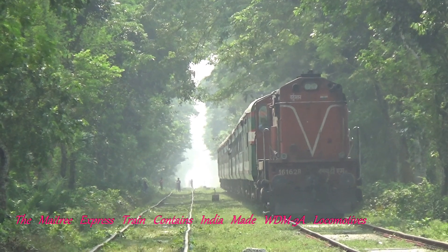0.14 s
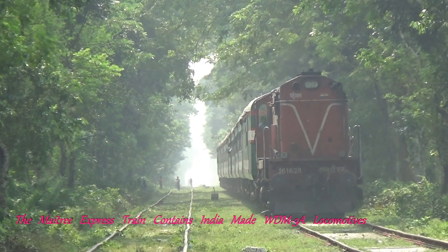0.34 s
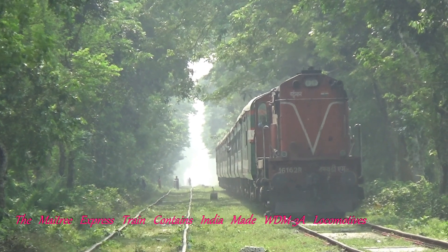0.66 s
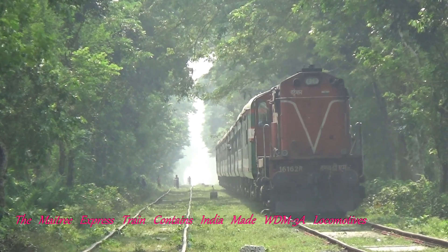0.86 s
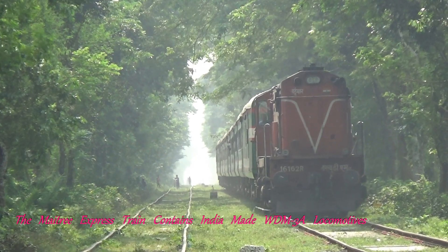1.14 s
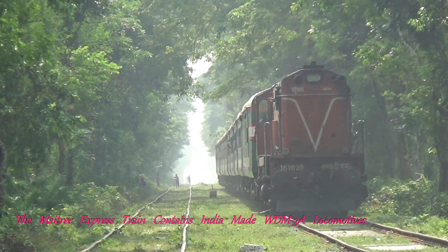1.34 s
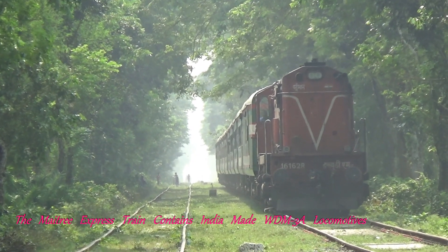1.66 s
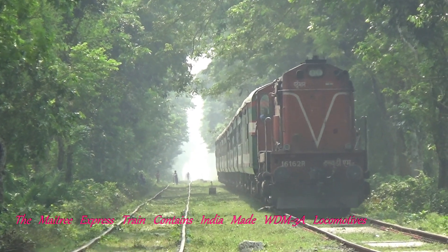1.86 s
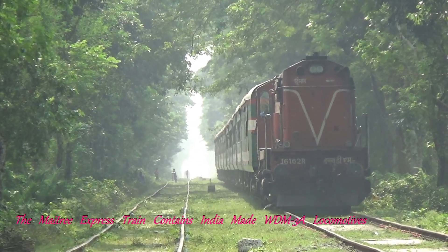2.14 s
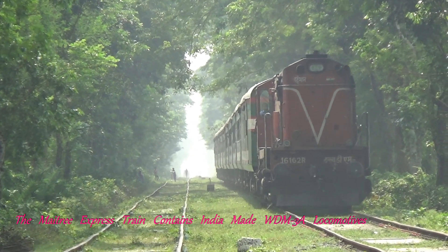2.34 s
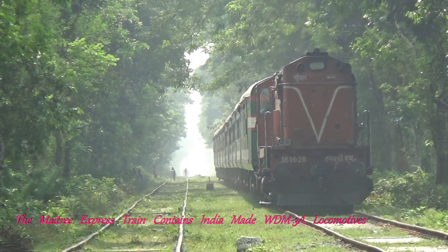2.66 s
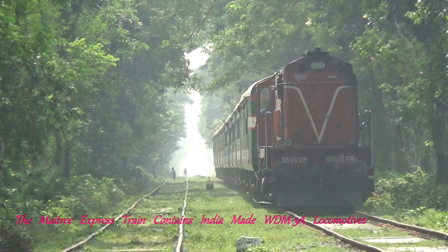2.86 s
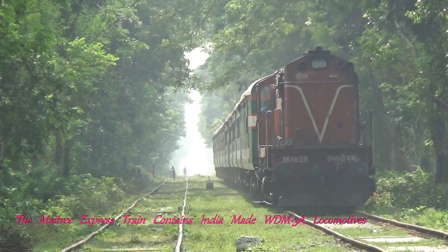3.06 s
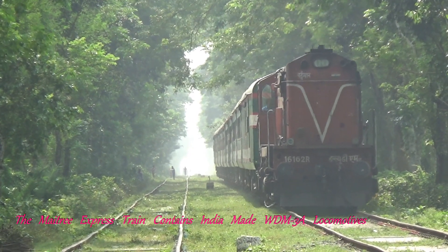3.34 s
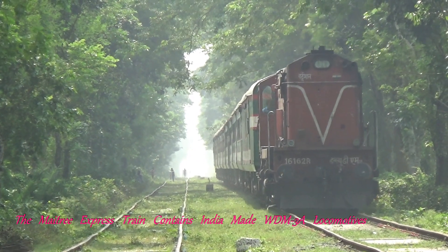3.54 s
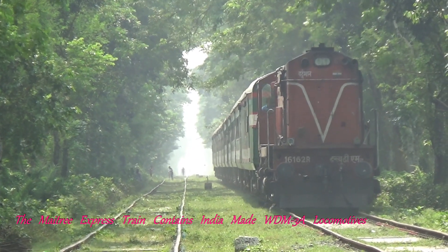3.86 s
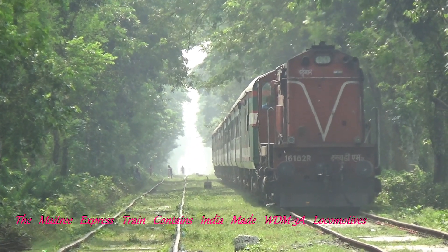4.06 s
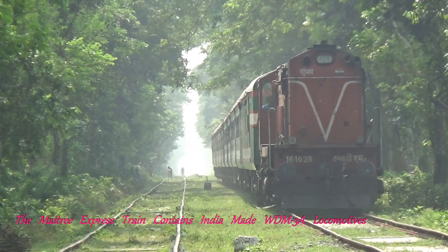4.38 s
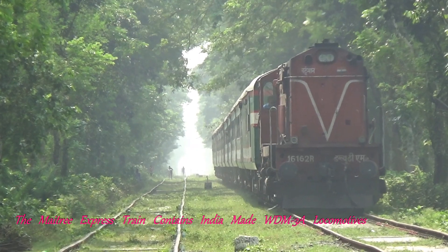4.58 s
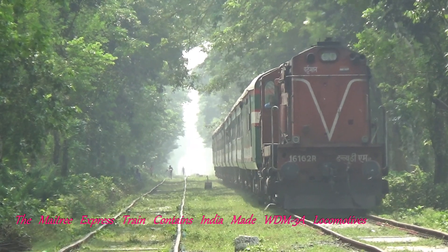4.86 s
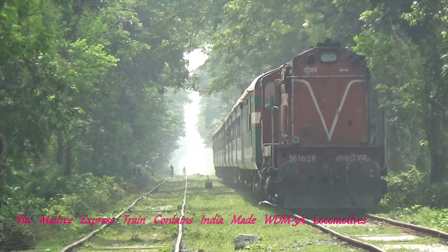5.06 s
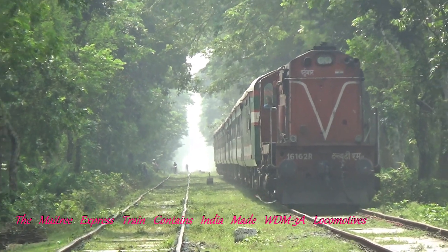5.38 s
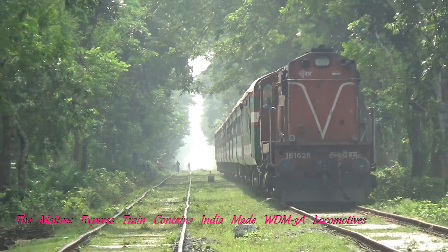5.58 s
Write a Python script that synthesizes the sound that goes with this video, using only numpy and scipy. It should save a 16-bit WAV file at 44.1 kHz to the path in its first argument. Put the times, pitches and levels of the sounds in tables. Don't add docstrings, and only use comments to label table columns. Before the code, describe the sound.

Outdoor forest track: low pulsing diesel idle with regular knocks, squirrel-like chirps, insects and brief bird whistles, broken by a few close camera-handling clicks.

```python
import sys
import numpy as np
from scipy import signal
from scipy.fft import rfft, irfft
from scipy.io import wavfile
from scipy.ndimage import uniform_filter1d

SR = 44100
rng = np.random.default_rng(int(sys.argv[2]) if len(sys.argv) > 2 else 0)


def transcribe(u):
    v = np.clip(np.atleast_2d(u).T, -1, 1)
    q = np.round(v * 32767).astype(np.int16)
    wavfile.write(sys.argv[1], SR, q)


def elevation(decibels):
    levels = np.asarray(decibels, float)
    return 10 ** (levels / 20)


N = 252252
T = np.arange(N) / SR

START_M, SPEED_M_S = 64, 2.63
CYCLE_S = .3006
HUM_DB, RUMBLE_DB, GEAR_DB, CLATTER_DB, AIR_DB = -56, -61, -74, -56, -72
LOAD_RUMBLE = 0.13
# pitch_hz, density_db
RUMBLE_SPECTRUM = [(15, -32), (25, -39), (49, 3.5), (75, -7.5), (95, 2.5), (123, -4.5), (231, -5),
                   (319, -16), (389, -18.5), (480, -13), (620, -45), (1060, -120)]
# pitch_hz, density_db
CLATTER_SPECTRUM = [(180, -25), (300, -5.5), (390, -7), (550, -1), (982, -1.5), (1080, -0.5), (1370, -7),
                    (1830, -4), (1980, -9), (2190, -5.5), (3530, -10.5), (4240, -11), (7000, -23.5),
                    (9100, -47), (15400, -120)]
CYLINDER_LEVELS = [1.4, 0.51, 0.47, 0.44, -0.06, 1.2, -0.85, 0.75, -0.1, 0.14, -0.66, 0.55, 0.52, 1.2, 0.3,
                   0.094]
# pitch_hz, width_hz, level_db
WHINES = [(152, 11, -71), (225.8, 13.5, -70.5), (273.4, 4.6, -73.5), (774, 35, -73), (1085.5, 28, -69.5)]
# centre_s, half_length_s, level_db
HUM_FADES = [(0.0, .12, -5.5), (.51, .09, -13), (1.0, .06, -4), (1.56, 0.21, -6), (1.94, .04, -8),
             (2.38, 0.31, -3.5), (3.08, 0.065, -5), (3.68, 0.091, -1.5), (4.16, 0.086, -9),
             (4.62, 0.17, -3.5), (5.72, 0.48, -8.5)]
# centre_s, half_length_s, level_db
GEAR_LOADS = [
    (.33, .04, 11),
    (1.0, .06, 4),
    (1.86, 0.031, 8),
    (2.3, 0.43, 11),
    (2.95, 0.23, 6),
    (3.42, .07, 5),
    (4.25, 0.028, 15),
    (4.45, 0.16, 5),
    (5.02, 0.27, 12.5),
]
# centre_s, half_length_s, level_db
AIR_PUFFS = [
    (0.0, .3, 6),
    (1.02, 0.28, 14.5),
    (2.0, .35, 10),
    (2.73, 0.32, 16),
    (4.2, .35, 9.5),
    (5.3, .6, 11),
]

UPPER_DB, LOWER_DB, CICADA_DB, HISS_DB = -78, -82, -74.5, -66.5
# pitch_hz, density_db
HISS_SPECTRUM = [(2940, -37), (5000, -9), (7310, -8.5), (8970, -8), (10300, -7), (11400, -11.5),
                 (15100, -13.5), (16000, -16)]
# centre_s, half_length_s, level_db
UPPER_RESTS = [(.15, 0.17, -6), (3.8, .3, -11), (5.1, .7, -7)]
# centre_s, half_length_s, level_db
LOWER_RESTS = [(.9, .25, -2), (3.5, .35, -7), (5.05, .3, -12)]
# centre_s, half_length_s, level_db
CICADA_RESTS = [(.1, .3, -4), (1.42, .2, -4), (2.9, 0.37, -3.5), (4.95, .3, -10)]

# start_s, peak_db, ring_hz
KNOCKS = [(0.2203, -55.5, 1650), (0.525, -55, 1160), (0.819, -48.5, 1250), (1.1171, -50, 1330),
          (1.4224, -49.5, 1250), (1.7123, -49.5, 2100), (2.0067, -50.5, 1250), (2.3106, -48.5, 1280),
          (2.614, -47.5, 1250), (2.9076, -45, 1070), (3.2096, -56, 1530), (3.5184, -51.5, 1390),
          (3.8191, -49.5, 1880), (4.126, -53.5, 1400), (4.4293, -49.5, 1100), (4.7292, -48, 1670),
          (5.032, -48, 1510), (5.3204, -47.5, 1120), (5.631, -47.5, 1480)]
TREBLE_DB, SCREEN_DB, SCREEN_S = 2, -21, 0.71

# start_s, peak_db
FIRST_NOTES = [(0.304, -46.5), (0.754, -51.5), (1.199, -46), (1.644, -51.5), (2.001, -48), (2.443, -46.5),
               (2.901, -47.5), (3.3752, -50), (3.8033, -46), (4.245, -48), (4.803, -47), (5.2629, -48.5),
               (5.712, -48)]
FIRST_HZ, FIRST_LOW_DB, FIRST_HOLD_S = 4854, -47, 0.0073
# start_s, peak_db, pitch_hz, overtone_db
SECOND_NOTES = [(0.3565, -41, 4344, -15.5), (0.8131, -45.5, 4410, -16), (1.249, -38.5, 4290, -18),
                (2.056, -45, 4440, -14.5), (2.497, -42.5, 4340, -14), (2.959, -43, 4350, -15),
                (3.4334, -45, 4310, -15), (3.8556, -41.5, 4274, -14.5), (4.2951, -41, 4345, -12.5),
                (4.369, -45, 4100, -17), (4.856, -43, 4540, -11), (5.3172, -46, 4300, -14)]
SECOND_HOLD_S = 0.021
CLEARING_S = .135

# start_s, top_s, end_s, top_hz, level_db
ARCHES = [
    (1.742, 1.62, 1.78, 8470, -63),
    (2.51, 2.59, 2.70, 7010, -66.5),
    (4.06, 4.115, 4.17, 7030, -74.5),
]
RISE_HZ_S2, FALL_HZ_S2 = 267000, 105000
# start_s, length_s, pitch_hz, level_db
WARBLE = [
    (1.027, 0.033, 3620, -56),
    (1.061, 0.023, 3560, -54),
    (1.084, .011, 3650, -51),
    (1.094, .01, 3470, -54),
    (1.105, .012, 3580, -57),
    (1.132, .012, 3400, -61),
    (1.554, .036, 3050, -61),
    (3.288, .025, 2750, -61),
]
DROP, DROP_S, SAG_HZ_PER_S = 0.28, 0.00257, 9300
TRILL_S, TRILL_END_S, TRILL_PEAK_S, TRILL_DB = 1.47, 1.585, 1.527, -61
TRILL_HZ, TRILL_FALL_HZ_PER_S, TRILL_RATE_HZ = 2350, 6300, 64
# centre_s, half_length_s, level_db
TRILL_SWELL = [
    (1.533, .014, 8),
    (1.58, .03, 4),
]

# start_s, peak_db, spray_t60_s, top_hz
TOUCHES = [
    [(1.4113, -24, 0.0037, 17000), (1.4116, -21, 0.0056, 12000), (1.4135, -32.5, 0.026, 6000),
     (3.911, -37.5, .01, 2500), (4.649, -41, .01, 4000)],
    [(4.0438, -29, 0.033, 14000), (4.0471, -18.5, 0.0055, 14000), (4.0479, -22, 0.014, 9000),
     (4.052, -41, .01, 4000)],
    [(4.557, -47.5, 0.034, 9000), (4.647, -37, 0.013, 5000), (4.655, -39, 0.013, 17000),
     (5.3545, -44, .02, 12000), (5.3571, -20, 0.017, 6900), (5.366, -12.5, 0.0021, 16200),
     (5.3664, -8.5, 0.0032, 8000), (5.3665, -16, 0.021, 12000)],
]
# pitch_hz, level_db, t60_s
PART_MODES = [
    [(834, -17, 0.073), (1790, 2, 0.017), (2250, 0, 0.016), (4000, -9.5, 0.018), (7140, 0, 0.0052),
     (9000, -1.5, 0.006), (12000, -5.5, .006), (14500, -15, .005)],
    [(1100, -2, 0.014), (2100, 4, 0.014), (3200, 3, 0.012), (4000, 2.5, 0.0095), (5570, 8.5, 0.0038),
     (8100, -1.5, 0.0061), (9800, -5.5, 0.0075), (13500, -30, .007)],
    [(1130, -12.5, 0.028), (1740, -9, .01), (2740, 1, 0.012), (3430, -0.5, 0.011), (5280, 5.5, 0.0065),
     (8500, 2, 0.013), (9870, 4, 0.0061), (12600, -4.5, 0.0059), (14300, -1, 0.005)],
]
# pitch_hz, level_db
SIDE_SPECTRUM = [(60, -46), (110, -43), (200, -39), (380, -20), (700, -19.5), (1290, -18), (2380, -25),
                 (4400, -25), (8120, -24.5), (15000, -31)]


def unit(x):
    return x / np.sqrt(np.mean(x ** 2))


def noise():
    return rng.standard_normal(N)


def colour(x, points):
    hz, db = np.transpose(points)
    log_hz = np.log(np.arange(1, len(x) // 2 + 2) * SR / len(x))
    return irfft(rfft(x) * elevation(np.interp(log_hz, np.log(hz), db)), len(x))


def band(x, hz, width):
    f = np.arange(len(x) // 2 + 1) * SR / len(x)
    return irfft(rfft(x) / (1 + (2 * (f - hz) / width) ** 2), len(x))


def walk(rate):
    k = int(SR / rate)
    held = np.repeat(rng.standard_normal(N // k + 1), k)
    slewed = uniform_filter1d(uniform_filter1d(held, k), k)
    return unit(slewed[:N])


def add(out, s, x):
    i = int(s * SR)
    out[i:i + len(x)] += x[:N - i]


def tone(hz, db):
    return np.sqrt(2) * elevation(db) * np.sin(2 * np.pi * np.cumsum(hz) / SR)


def swells(rows):
    return sum(db * np.exp(-((T - s) / half) ** 2) for s, half, db in rows)


def edges(start, end, ramp):
    return np.clip(np.minimum(T - start, end - T) / ramp, 0, 1)


def forest(x, t60, wet_db, ring=0):
    t = T[:SR // 2]
    tail = rng.standard_normal(len(t)) * np.minimum(t / 0.0017, 1) * elevation(-60 * t / t60)
    tail *= 1 + ring / (1 + (t / CLEARING_S) ** 10)
    wet = signal.fftconvolve(x, tail / np.sqrt(np.sum(tail ** 2)))
    length = max(len(t), len(x))
    return elevation(wet_db) * wet[:length] + np.pad(x, (0, length - len(x)))


def repeating(share):
    cycles = rng.standard_normal((int(N / SR / CYCLE_S) + 1, int(CYCLE_S * SR)))
    cycles[1:] *= np.sqrt(1 - share ** 2)
    return signal.lfilter([1], [1, -share], cycles, axis=0).ravel()[:N]


def engine():
    near_db = 20 * np.log10(START_M / (START_M - SPEED_M_S * T))
    load_db = swells(GEAR_LOADS)
    hum_db = HUM_DB + near_db + swells(HUM_FADES)
    hum = tone(76.2 + 0.39 * walk(5.95), hum_db + 0.86 * walk(12))
    gear = tone(554 + 1.8 * walk(10), GEAR_DB + near_db + load_db + .9 * walk(11))

    rumble_db = RUMBLE_DB + near_db + LOAD_RUMBLE * load_db
    rumble = unit(colour(repeating(0.69), RUMBLE_SPECTRUM)) * elevation(rumble_db)

    cylinder = (T - KNOCKS[0][0]) / CYCLE_S % 1 * len(CYLINDER_LEVELS)
    gate_db = np.interp(cylinder, np.arange(len(CYLINDER_LEVELS) + 1), CYLINDER_LEVELS + CYLINDER_LEVELS[:1])
    clatter_db = CLATTER_DB + near_db + gate_db + 0.67 * walk(25.086)
    clatter = unit(colour(repeating(0.25), CLATTER_SPECTRUM)) * elevation(clatter_db)

    whines = sum(elevation(db + 2.96 * walk(2.95)) * unit(band(noise(), hz, width)) for hz, width, db in WHINES)
    air_db = AIR_DB + swells(AIR_PUFFS) - 7 + 1.5 * walk(8.3)
    air = unit(band(noise(), 4900, 2600)) * elevation(air_db)
    return hum + gear + rumble + clatter + whines + air


def cricket(hz, width, start, period, pulse, count):
    t = (T - start) % period
    strokes = np.sin(np.pi * t / pulse) ** 2 * (t < count * pulse)
    return strokes * tone(hz + width * walk(43), 7.5 + 1.3 * walk(25.1))


def insects():
    upper = cricket(8240, 40, .0175, .1205, .032, count=2)
    upper *= elevation(UPPER_DB + swells(UPPER_RESTS))
    lower = forest(cricket(7870, 50, .06, .124, .029, count=3), .3, 0)
    lower *= elevation(LOWER_DB + swells(LOWER_RESTS))
    faint = sum(unit(band(noise(), hz, 60)) * elevation(db) for hz, db in [(7230, -85.5), (8560, -81.5)])
    cicada = unit(band(noise(), 10150, 600)) + .5 * unit(band(noise(), 10680, 150))
    cicada *= elevation(CICADA_DB + swells(CICADA_RESTS) + 2.1 * walk(23.8))
    hiss = unit(colour(noise(), HISS_SPECTRUM)) * elevation(HISS_DB - .5)
    return upper + lower + faint + cicada + hiss


def knocks():
    out, t = np.zeros(N), T[:4096]
    shape = np.minimum(t / 0.00084, 1) * elevation(-60 * np.maximum(t - .012, 0) / 0.039)
    for s, db, hz in KNOCKS:
        burst = rng.standard_normal(len(t)) * shape
        treble_db = TREBLE_DB + SCREEN_DB * np.exp(-s / SCREEN_S)
        ring = unit(band(burst, hz, 470)) + elevation(treble_db) * unit(band(burst, 3150, 3200))
        add(out, s, ring / np.abs(ring).max() * elevation(db + 5.5))
    return out


def chirp(hz, low_db, high_db, hold, slide, late, length, wet_db):
    t = T[:8192]
    waver = np.interp(t, t[::256], rng.standard_normal(32))
    pitch = hz * (1 - slide * np.exp(-t / .0035) + .004 * waver)
    phase = 2 * np.pi * np.cumsum(pitch) / SR
    held = elevation(2.5 * waver) / (1 + (t / hold) ** 4)
    swell = np.minimum(t / 0.0031, 1) * (np.exp(-(t / length) ** 2) + 0.22 * held)
    low = elevation(low_db) * swell * np.sin(phase)
    high = elevation(high_db) * np.clip(t / late, 0, 1) ** 2 * held * np.sin(2 * phase)
    settled = band(low, 1.006 * hz, 1000)
    out = forest(settled, 1.16, wet_db, ring=0.96) + forest(high, 0.42, 2)
    add(out, 0, low - settled)
    return out


def caller():
    out = np.zeros(N)
    for s, db in FIRST_NOTES:
        low_db = FIRST_LOW_DB + 0.12 * db
        note = chirp(FIRST_HZ, low_db, db - .5, FIRST_HOLD_S, slide=0.161, late=0.0055, length=0.006, wet_db=8.3)
        add(out, s - .004, note)
    for s, db, hz, overtone_db in SECOND_NOTES:
        high_db = db + overtone_db - 2
        note = chirp(hz, db - 4.5, high_db, SECOND_HOLD_S, slide=0.28, late=0.0069, length=.011, wet_db=4.85)
        add(out, s - .0025, note)
    return out


def birds():
    out, flutter = np.zeros(N), walk(90)
    wobble = np.roll(flutter, SR)
    for start, top, end, hz, db in ARCHES:
        bend = np.where(T < top, RISE_HZ_S2, FALL_HZ_S2) * np.clip(T - top, -.2, .2) ** 2
        out += edges(start, end, .0066) * tone(hz - bend, db + 3 * flutter)
    for s, length, hz, db in WARBLE:
        t = np.clip(T - s, 0, length)
        drop = np.exp(-t / DROP_S)
        pitch = hz * (1 + DROP * drop) - SAG_HZ_PER_S * t + 70 * wobble
        out += edges(s, s + length, .003) * tone(pitch, db - 12 * drop + 3 * flutter)
    pitch = TRILL_HZ - TRILL_FALL_HZ_PER_S * np.clip(T - TRILL_S, 0, .2)
    beat = np.cos(np.pi * TRILL_RATE_HZ * (T - TRILL_PEAK_S)) ** 2
    trill = (.08 + beat) * tone(pitch, TRILL_DB + swells(TRILL_SWELL))
    return out + edges(TRILL_S, TRILL_END_S, .005) * trill


def clicks():
    out, t = np.zeros(N), T[:2048]
    for touches, modes in zip(TOUCHES, PART_MODES):
        ring = np.zeros(len(t))
        for k, (hz, mode_db, mode_t60) in enumerate(modes):
            ring += (-1) ** k * elevation(mode_db - 160 * t / mode_t60) * np.sin(2 * np.pi * hz * t)
        for s, db, t60, top_hz in touches:
            spray = 0.31 * rng.standard_normal(len(t)) * elevation(-60 * t / t60)
            spray[0] = 1
            push = np.exp(-2 * np.pi * top_hz * t[:64])
            crack = signal.fftconvolve(np.convolve(spray, push), ring)
            add(out, s, crack / np.abs(crack).max() * elevation(db))
    return signal.sosfilt(signal.butter(4, [650, 16500], "band", fs=SR, output="sos"), out)


def scene():
    calls = caller() + forest(birds(), .4, -10)
    far = engine() + forest(knocks(), 0.77, -0.45) + insects()
    far = signal.sosfiltfilt(signal.butter(12, 15900, fs=SR, output="sos"), far)
    near = clicks()
    scatter = rng.standard_normal(8192) * elevation(-60 * T[:8192] / .2)
    wide = signal.fftconvolve(far + elevation(5) * calls, scatter / np.sqrt(np.sum(scatter ** 2)))[:N]
    touch = elevation(-12) * band(near, 1500, 2500) + elevation(-36.5) * np.gradient(near)
    side = colour(wide, SIDE_SPECTRUM) + np.gradient(touch) * 4
    return far + calls + near + side * np.array([[1], [-1]])


def low_pass(x):
    return signal.sosfilt(signal.butter(12, 17020, fs=SR, output="sos"), x)


def record(dry):
    return low_pass(dry)


dry = scene()
out = record(dry)
transcribe(out)
```